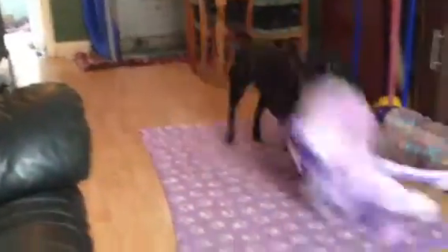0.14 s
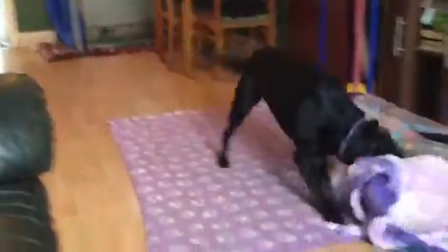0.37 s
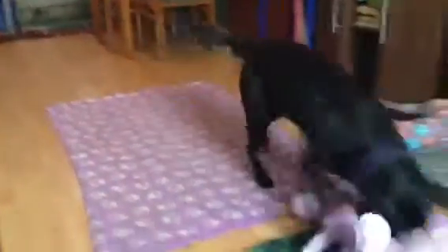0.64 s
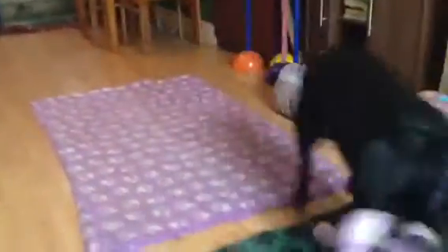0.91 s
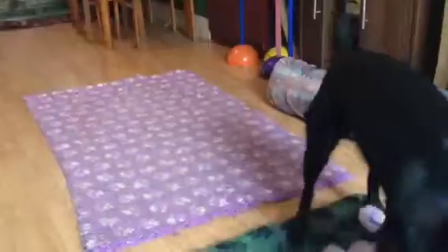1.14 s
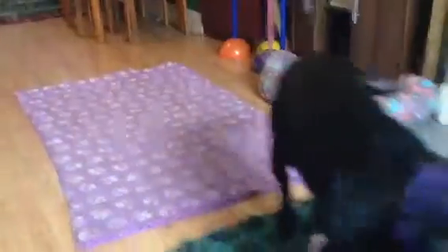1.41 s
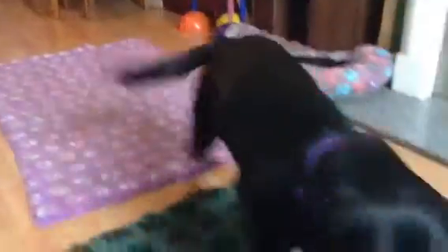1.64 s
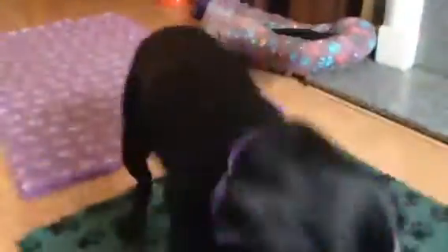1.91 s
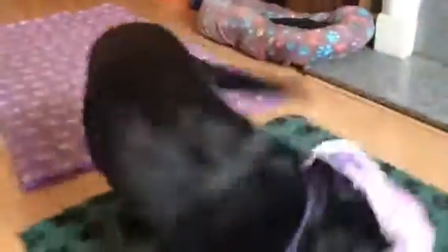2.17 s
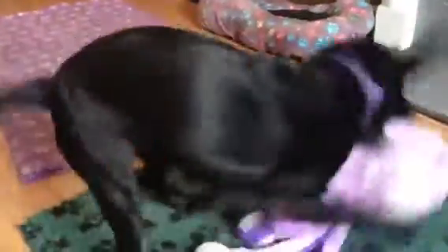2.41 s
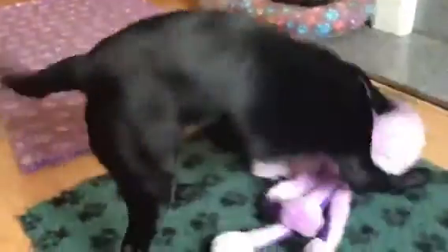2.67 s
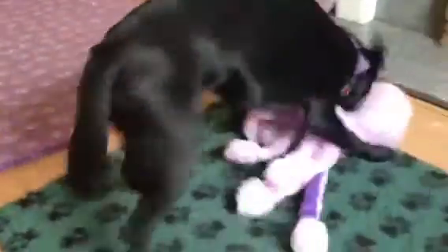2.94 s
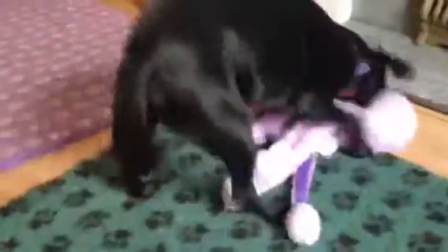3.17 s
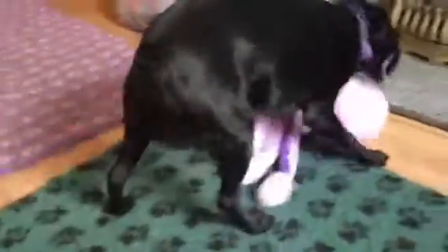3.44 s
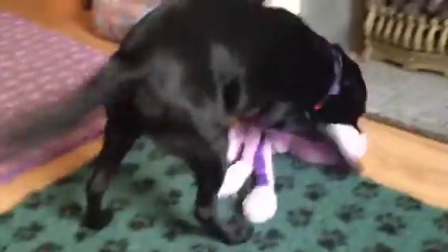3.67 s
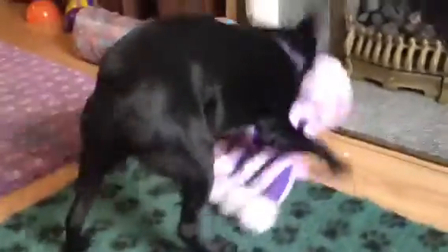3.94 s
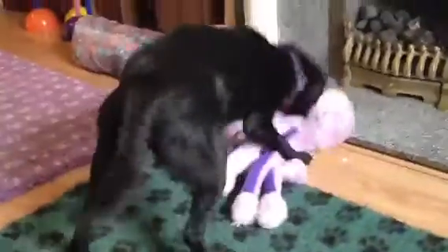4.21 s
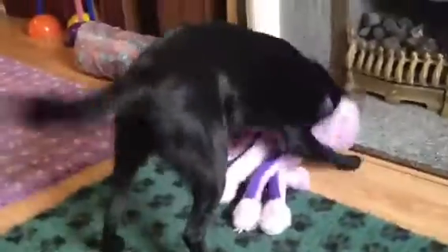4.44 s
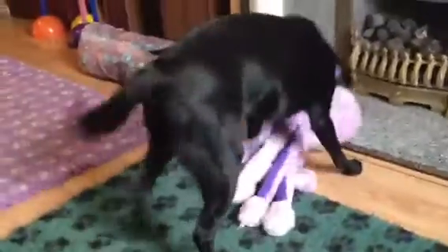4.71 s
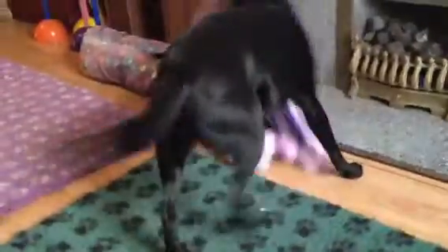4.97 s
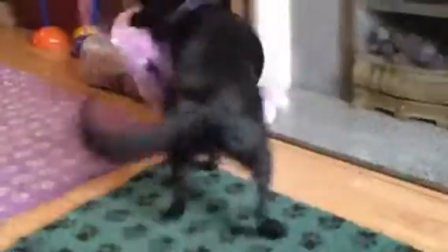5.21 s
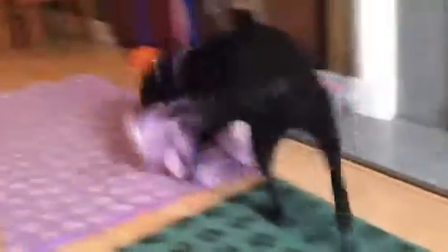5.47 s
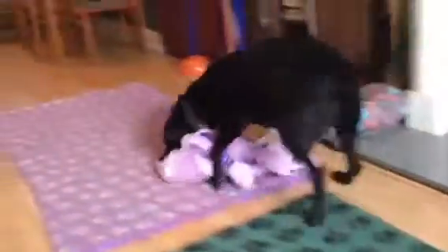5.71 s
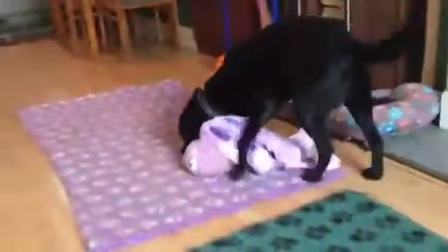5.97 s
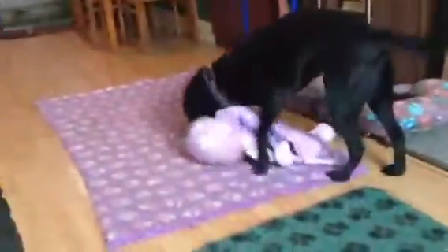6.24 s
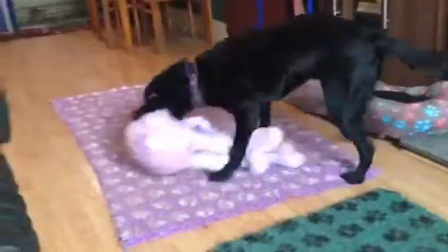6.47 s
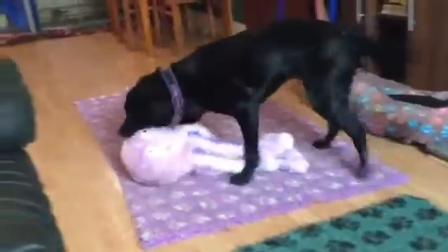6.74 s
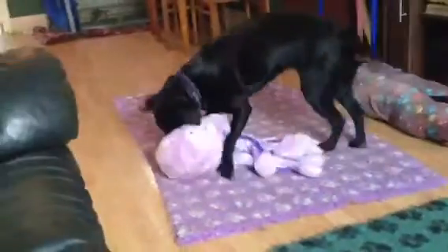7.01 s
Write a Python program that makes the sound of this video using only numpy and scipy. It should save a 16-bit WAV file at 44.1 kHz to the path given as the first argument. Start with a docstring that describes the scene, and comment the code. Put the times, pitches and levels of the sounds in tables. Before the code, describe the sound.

In a small furnished room, a dog shakes and drags a plush toy close to a phone. Brisk cloth rustling runs throughout, with dull paw thumps on wooden boards, brief claw squeaks and light ticking pops early on. Then bites bring short reedy grunts from the toy and loud dry plastic cracks, before a last tussle fades into softer rubbing.

```python
"""In a small furnished room, a dog shakes, drags and bites a plush toy over fleece mats on a wooden floor,
a couple of metres from a phone. Shaped noise makes the rustling cloth and the quiet hush of the house;
decaying tones make paws and toy thump on the boards, and unsteady tones make the claws squeak.
Plastic and seams pop as short bursts of noise with a ring. Bites drive a grunting reed, whose flaps
knock a resonant tube. The room answers toy, claws and cloth with a floor bounce and a brief tail."""
import sys
import numpy as np
from scipy import signal
from scipy.fft import rfft, irfft
from scipy.io import wavfile
from scipy.ndimage import uniform_filter1d

SR = 44100
rng = np.random.default_rng(int(sys.argv[2]) if len(sys.argv) > 2 else 0)


def digitize_waveform(pressure):
    """Quantize a signal to 16-bit integers and store it at the path in sys.argv[1].

    Rows of a 2-D input are taken as channels; values are limited to [-1, 1].
    """
    field = np.atleast_2d(pressure).T
    bounded = np.clip(field, -1, 1)
    quanta = np.round(bounded * 32767).astype(np.int16)
    wavfile.write(sys.argv[1], SR, quanta)


def rack_gain(trim_db):
    """Turn a fader trim in dB into the linear factor to multiply a signal by."""
    fader = np.asarray(trim_db, float)
    return 10 ** (fader / 20)


N = 313992  # length of the sound in samples


def level(x, db):
    """Scale to an rms level."""
    return x * rack_gain(db) / np.sqrt(np.mean(x ** 2))


def colour(x, table):
    """Shape the spectrum by (Hz, dB) points, joined evenly along log frequency."""
    hz, db = np.transpose(table)
    f = np.maximum(np.fft.rfftfreq(len(x), 1 / SR), 1)
    gain = rack_gain(np.interp(np.log(f), np.log(hz), db))
    return irfft(rfft(x) * gain, len(x))


def ring(modes, push_s=0., rise_s=1e-5):
    """Decaying sines (Hz, dB, t60 s), neighbours opposed in sign, after a push of given length; peak 1."""
    t = np.arange(int(SR * max(t60 for _, _, t60 in modes))) / SR
    y = np.zeros(len(t))
    for k, (hz, db, t60) in enumerate(modes):
        decay = np.exp(-np.log(1000) * t / t60)
        y += (-1) ** k * rack_gain(db) * np.sin(2 * np.pi * hz * t) * decay
    push = np.hanning(int(push_s * SR) + 3)
    y = np.convolve(y * (1 - np.exp(-t / rise_s)), push)
    return y / np.abs(y).max()


def add(out, s, x):
    """Mix x into out from time s."""
    i = int(s * SR)
    out[i:i + len(x)] += x[:len(out) - i]


def track(rows):
    """Start time and per-sample columns of a curve."""
    s, *columns = np.transpose(rows)
    t = np.arange(s[0], s[-1], 1 / SR)
    return s[0], [np.interp(t, s, c) for c in columns]


# Tone of the quiet house, before its overall level is set: (pitch_hz, relative_level_db)
HUSH_COLOUR = [(24, -55), (40, -62), (171, 3.5), (392, -7.5), (455, 0), (585, -10), (646, -44), (715, -28),
               (1150, -10.5), (14800, -52), (16000, -51)]


def hush():
    """The quiet house is steady noise, strongest in the low and middle pitches."""
    return level(colour(rng.standard_normal(N), HUSH_COLOUR), -65.5)


def swells(peak_s, db, rise_s, fall_s):
    """Gain of overlapping gestures, each climbing to its peak and falling away at a steady dB rate."""
    t = np.arange(0, N / SR + .004, .002)[:, None]
    tens_of_db_down = np.maximum((peak_s - t) / rise_s, (t - peak_s) / fall_s)
    power = rack_gain(2 * (db - 10 * tens_of_db_down))
    return np.interp(np.arange(N) / SR, t[:, 0], np.sqrt(power.sum(axis=1)))


def fibres(rate, spread_db, hiss):
    """Fibres letting go at random (rate per second), some louder than the rest, over a smooth hiss."""
    sizes = rack_gain(spread_db * np.minimum(rng.exponential(size=N), 4))
    slips = (rng.random(N) < rate / SR) * sizes * rng.standard_normal(N)
    return level(slips, 0) + hiss * rng.standard_normal(N)


# Strokes of cloth over cloth; the rise and fall times are per 10 dB, for the crisp part:
# (peak_s, crisp_level_db, rise_s, fall_s, dull_relative_to_crisp_db)
CLOTH_STROKES = [(0.0, -46, .05, .1, -3), (.196, -44, .008, .2, -12), (.3, -38.5, .1, .3, -3),
                 (.54, -44, .16, .12, -4), (.655, -37, .06, .08, 6), (.74, -39, .03, .08, 1),
                 (.84, -36.5, .08, .045, -6), (.94, -42, .1, .12, -11), (1.1, -42.5, .1, .11, -1),
                 (1.3, -47, .07, .07, 4), (1.38, -56, .05, .04, 5), (1.66, -47.5, .13, .18, -2),
                 (2.02, -52.5, .05, .06, -6), (2.168, -49, .005, .1, -8), (2.24, -43.5, .04, .2, -1),
                 (2.44, -45, .09, .08, 5), (2.6, -44, .13, .3, -3), (2.93, -46, .07, .2, -6),
                 (3.3, -42, .2, .15, -21), (3.56, -49, .2, .2, -21), (3.86, -48, .1, .2, -8),
                 (4.04, -41, .06, .15, -1), (4.36, -54, .1, .3, -9), (4.72, -45, .28, .13, -22),
                 (4.9, -45, .08, .18, -11), (5.08, -42.5, .04, .11, -8), (5.3, -47.5, .06, .07, -5),
                 (5.46, -44, .13, .09, -2), (5.54, -43, .05, .055, -7), (5.69, -39, .11, .2, -4),
                 (5.92, -51, .15, .3, -21), (6.1, -48, .1, .04, -12), (6.22, -46.5, .025, .2, -7),
                 (6.45, -45, .14, .08, -8), (6.6, -52.5, .08, .07, -11), (6.77, -59, .025, .16, -18),
                 (6.95, -47, .05, .14, -11), (7.12, -51, .03, .03, -18)]
# Weight shifting on the mats, passed on by the boards; fade per 10 dB either side:
# (peak_s, level_db, fade_s)
MAT_SCUFFS = [(0.0, -58, .08), (.26, -50, .07), (.64, -51, .09), (.84, -41, .04), (1.02, -46, .07),
              (1.38, -57, .2), (1.66, -59, .1), (1.82, -53, .045), (2.2, -54, .05), (2.34, -44, .08),
              (2.62, -46.5, .15), (2.86, -54, .12), (3.3, -50, .2), (3.56, -57, .3), (3.94, -53, .08),
              (4.43, -56, .3), (4.8, -58, .2), (5.1, -59, .07), (5.54, -46, .04), (5.69, -45, .14),
              (6.04, -45, .07), (6.22, -52.5, .08), (6.66, -54, .12), (6.95, -61, .3)]
# Tone of the crisp nap: (pitch_hz, relative_level_db)
NAP_COLOUR = [(880, -7), (1500, -2), (2410, -0.5), (2640, -0.5), (3770, 0.5), (6560, 2.5), (9850, -8.5),
              (12700, -9.5), (15200, -24), (16000, -56)]
# Tone of the dull backing: (pitch_hz, relative_level_db)
BACKING_COLOUR = [(400, -17), (800, 1.5), (1300, -10), (2200, -5), (3500, 11.5), (6000, 25)]
# Tone of the low shuffle through the boards: (pitch_hz, relative_level_db)
SHUFFLE_COLOUR = [(50, -17), (100, -24.5), (200, 10.5), (350, 16.5), (550, 5), (800, -1.5)]
# Pitches of the stray crackles: pitch_hz
CRACKLE_PITCHES = [3000, 4600, 5930, 7940]


def cloth():
    """Plush and fleece rub: crisp nap with stray crackles, dull backing, a low shuffle through the boards."""
    s, db, rise, fall, dull_db = np.transpose(CLOTH_STROKES)
    scuff_s, scuff_db, fade = np.transpose(MAT_SCUFFS)
    dull_quick = 1.4  # the dull rub swells and fades this many times faster
    crisp = level(colour(fibres(rate=4000, spread_db=2.2, hiss=1.5), NAP_COLOUR), 0)
    crackle = np.zeros(N)
    for hz in CRACKLE_PITCHES:
        clicks = fibres(rate=25, spread_db=2.5, hiss=0)
        crackle += np.convolve(clicks, ring([(hz, 0, .003)]))[:N]
    nap = crisp + level(crackle, -11)
    backing = level(colour(fibres(rate=1200, spread_db=2.5, hiss=1.5), BACKING_COLOUR), 0)
    shuffle = level(colour(fibres(rate=200, spread_db=4.0, hiss=0.98), SHUFFLE_COLOUR), 0)
    nap = nap * swells(s, db, rise, fall)
    backing = backing * swells(s, db + dull_db, rise / dull_quick, fall / dull_quick)
    return nap + backing + shuffle * swells(scuff_s, scuff_db, fade, fade)


# Paws and toy landing on the boards: (start_s, soft_peak_db, knuckle_relative_to_soft_db)
LANDINGS = [(0.027, -49, -13), (0.2, -34.5, -13), (0.654, -47, 0), (0.817, -49, 12), (0.986, -30, -0.5),
            (1.1, -50, -11), (1.814, -54.5, 3), (2.001, -43, 2), (2.301, -52.5, -1), (3.001, -41.5, -2),
            (3.293, -41.5, 17), (5.093, -47, -9), (5.526, -32, -4.5), (5.834, -35.5, -3),
            (5.963, -58.5, 19.5), (6.01, -55.5, 15), (6.681, -69, 24), (6.788, -53, -18)]
# Ringing tones of the boards: (pitch_hz, relative_level_db, time_to_fade_60_db_s)
BOARD_TONES = [(108.7, 11.5, 0.17), (135, 9, 0.23), (180, 2.5, 0.41)]
# Ringing tones of the higher knock: (pitch_hz, relative_level_db, time_to_fade_60_db_s)
KNUCKLE_TONES = [(260, -7.5, 0.1), (347.3, -13, 0.14), (455, -11.5, .09), (599, -11.5, 0.039)]


def thumps():
    """A soft pad pushes the boards slowly; bone under it adds a higher knock."""
    out = np.zeros(N)
    for s, db, knock_db in LANDINGS:
        add(out, s, rack_gain(db) * ring(BOARD_TONES, push_s=0.006, rise_s=.004))
        add(out, s, rack_gain(db + knock_db) * ring(KNUCKLE_TONES, push_s=0.0014, rise_s=0.0018))
    return out


# Claws skidding on varnish, one list of points per squeak:
# (time_s, mean_slip_rate_hz, mean_level_of_lowest_tone_db)
CLAW_SKIDS = [
    [(.441, 1108, -61), (.447, 1185, -38), (.456, 1190, -56)],
    [(.615, 1490, -34), (.621, 2000, -29), (.627, 3075, -34), (.632, 3423, -27), (.645, 3120, -28),
     (.651, 3080, -30.5), (.659, 2720, -46)],
    [(.82, 1350, -56), (.835, 1350, -48), (.87, 1300, -59), (.9, 1600, -53), (.94, 1850, -56),
     (.985, 2050, -54)],
]
# One row per squeak, lowest tone first, then its whole multiples: relative_level_db
CLAW_OVERTONES = [
    [0, -1, -2, -9, -8, -5],
    [0, -15, -12, -12],
    [0, -6],
]


def squeaks():
    """Claws stick and slip on the varnish: tones with overtones, unsteady in pitch and strength."""
    waver, flutter_db = .013, 2.5  # typical drift: share of the pitch, and dB
    out = np.zeros(N)
    for rows, overtones in zip(CLAW_SKIDS, CLAW_OVERTONES):
        s, (hz, db) = track(rows)
        smooth = uniform_filter1d(rng.standard_normal((2, SR // 4)), size=60)
        drift = level(smooth, 0)[:, :len(hz)]
        phase = 2 * np.pi * np.cumsum(hz * (1 + waver * drift[0])) / SR
        tone = np.zeros(len(hz))
        for multiple, overtone_db in enumerate(overtones, 1):
            tone += rack_gain(overtone_db) * np.sqrt(2) * np.cos(multiple * phase)
        strength = rack_gain(db + flutter_db * drift[1])
        add(out, s, strength * signal.windows.tukey(len(hz), .15) * tone)
    return out


# Plastic and seams popping under the teeth; a second snap is held to no louder than the first:
# (start_s, peak_db, ring_pitch_hz, second_snap_relative_db)
TOOTH_POPS = [(0.434, -29, 3720, -8), (0.6528, -27, 3070, -22), (0.8396, -29, 6360, -12),
              (1.0864, -26, 5740, -9), (1.123, -32, 4630, -14), (1.1644, -32, 4570, -4),
              (1.199, -26.5, 5960, -10.5), (1.266, -26.5, 6760, -15), (1.3609, -26.5, 6620, -5),
              (1.502, -35.5, 7000, -11), (2.1629, -35, 4600, -6), (2.1793, -30, 4200, -6),
              (2.4358, -27, 6450, -6), (2.4584, -25.5, 6300, -1), (2.5146, -27, 6100, -20),
              (2.5685, -30, 6300, -8), (3.2917, -2.5, 6120, -1.5), (3.4815, -15.5, 6150, 0),
              (3.5504, -33, 6320, -6), (4.0197, -30, 7000, -14), (4.0547, -12, 6000, 0),
              (4.4607, -30, 4660, 0), (4.4737, -8.5, 6100, -2), (4.7267, -18, 4330, -19),
              (4.743, -24.5, 5400, -4), (5.0647, -26.5, 6900, -14), (5.0886, -15, 6020, 0),
              (5.466, -29, 4060, -2), (5.6925, -9.5, 5670, -5), (5.7017, -29, 3700, 0),
              (6.3804, -32, 5030, -14), (6.4222, -25, 4310, -11), (6.4584, -35, 5400, -10),
              (6.4698, -21.5, 4450, -21), (6.5906, -36, 6600, 0), (6.6478, -25, 8520, -11),
              (6.749, -32, 5660, 0), (7, -32.5, 3000, -15)]
# Tone shared by every tear: (pitch_hz, relative_level_db)
SHELL_COLOUR = [(1200, -28), (2200, -12), (3200, -11), (4200, -1), (7500, -1.5), (9000, -10),
                (11000, -18.5), (14000, -15), (16000, -51)]


def pops():
    """Stiff plastic gives way, then once more: a dry tear of noise with a short ring of its own."""
    tear_t60, ring_db, again_s = 0.009, -5, .0021  # s; dB against the tear's peak; s between snaps
    out = np.zeros(N)
    t = np.arange(1024) / SR
    shape = (1 - np.exp(-t / 0.00054)) * np.exp(-np.log(1000) * t / tear_t60)
    for s, db, hz, again_db in TOOTH_POPS:
        for lag, gain_db in [(0, db), (again_s, db + min(again_db, 0))]:
            tear = shape * colour(rng.standard_normal(len(t)), SHELL_COLOUR)
            snap = tear / np.abs(tear).max()
            add(snap, 0, rack_gain(ring_db) * ring([(hz, 0, .006)], rise_s=.0003))
            add(out, s + lag, rack_gain(gain_db) * snap / np.abs(snap).max())
    return out


def bite(squeeze_s, release_s, top_hz, db):
    """Pressure builds evenly, then lets go; the reed's flap rate and strength follow."""
    slack_hz, sag = 128, 1.4  # flap rate at no pressure; bends the fall of the rate
    swell_db_per_hz, let_go_db = .021, 13  # swell per Hz gained; fade while letting go
    t = np.arange(0, squeeze_s + release_s, 1 / SR)
    up = np.minimum(t / squeeze_s, 1)
    down = np.clip((t - squeeze_s) / release_s, 0, 1)
    hz = slack_hz + (top_hz - slack_hz) * up * (1 - down) ** sag
    swell_db = swell_db_per_hz * (top_hz - slack_hz) * (1 - up)
    return hz, db - swell_db - let_go_db * down ** 2.5


# Bites on the grunter, whose reed flaps faster under more pressure; strength before the tube's ring:
# (start_s, squeeze_s, release_s, top_flap_rate_hz, top_flap_strength_db)
GRUNTER_BITES = [(2.644, .05, .043, 329, -9), (2.935, .036, .042, 320, -6.5),
                 (3.163, .047, .045, 312, -9.5), (3.633, .02, .04, 132, -18), (4.065, .08, .022, 307, -7.5),
                 (4.2, .004, .024, 198, -10), (4.489, .028, .09, 205, -14), (5.599, .046, .1, 162, -17.5)]
# How each bite tips the tube's tone at its high and low ends: (treble_gain_db, chest_gain_db)
BITE_TONE = [(-3, 15), (-1.5, 11), (-2.5, 13), (0.4, 14), (-4, 9.5), (-4.5, 15.5), (-2.1, 13), (-5, 10)]
# Ringing tones of the tube before each bite tips them:
# (pitch_hz, relative_level_db, time_to_fade_60_db_s)
TUBE_TONES = [(320, -13.5, 0.0093), (568, -9.5, 0.0067), (1057, -5.5, 0.015), (1300, 0.5, 0.016),
              (1600, 6, 0.01), (2182, 1, 0.005), (2750, -3.5, 0.0038), (3690, -1.5, 0.01),
              (4230, -1, 0.013), (5340, -28.5, 0.0059), (7200, -23, 0.018)]
# Tone of the air rasping past the reed: (pitch_hz, gain_db)
RASP_COLOUR = [(1500, -21), (3000, 8.5), (5000, 10.5), (8000, -2), (10000, -7.5), (13000, -1), (16000, -25)]


def grunter():
    """Each flap of the reed knocks the tube; air hisses through it and rasps past the reed just after."""
    jitter, scatter_db, air_db = .02, 1.1, -26  # share of a flap; dB; hiss into the tube, dB
    out, rasp = np.zeros((2, N))
    for (s, *jaws), (treble_db, chest_db) in zip(GRUNTER_BITES, BITE_TONE):
        hz, db = bite(*jaws)
        cycle = np.cumsum(hz) / SR
        flap = cycle.astype(int)
        edges = np.flatnonzero(np.diff(flap, prepend=-1))
        chance = rng.standard_normal((2, len(edges)))
        wobble = (jitter * chance[0] * SR / hz[edges]).astype(int) * (edges > 0)
        # air bursts at each flap and dies away; none comes before the second flap
        puff = np.exp(-(cycle - flap) / 0.29) * (flap > 0)
        air = rack_gain(db) * rng.standard_normal(len(hz)) * puff
        knock = rack_gain(air_db) * air
        hits = np.clip(edges + wobble, 0, len(hz) - 1)
        knock[hits] += rack_gain(db[edges] + scatter_db * chance[1])
        knock[0] *= rack_gain(-7)  # the reed's first swing barely closes
        modes = []
        for f, g, t60 in TUBE_TONES:
            tip_db = np.interp(f, [700, 1200, 2400, 3500], [chest_db, 0, 0, treble_db])
            modes.append((f, g + tip_db, t60))
        add(out, s, signal.fftconvolve(knock, ring(modes, rise_s=.0004)))
        add(rasp, s, rack_gain(treble_db - 13) * air)
    # so small a tube cannot radiate bass
    no_bass = signal.butter(3, 190, "high", fs=SR, output="sos")
    return signal.sosfilt(no_bass, out) + colour(rasp, RASP_COLOUR)


# How long the room rings at each pitch: (pitch_hz, time_to_fade_60_db_s)
ROOM_FADE = [(100, 0.51), (500, 0.33), (1500, 0.36), (4000, 0.26), (8000, 0.17), (15000, 0.11)]


def room(dry, floor_db, tail_db, floor_s=.0034, gap_s=.006):
    """Direct sound, its bounce off the mats, and a diffuse tail that dulls as it dies."""
    size = SR * 3 // 5
    f, t, z = signal.stft(rng.standard_normal(size), SR, nperseg=256)
    hz, t60 = np.transpose(ROOM_FADE)
    fall = np.interp(np.log(f + 1), np.log(hz), t60)[:, None]
    tail = signal.istft(z * np.exp(-np.log(1000) * t / fall), SR)[1][:size]
    tail *= 1 - np.exp(-(np.arange(size) / SR / gap_s) ** 2)  # the tail builds up gradually
    answer = rack_gain(tail_db) * tail / np.sqrt(np.sum(tail ** 2))
    answer[0] += 1
    answer[int(floor_s * SR)] += rack_gain(floor_db)
    return signal.fftconvolve(dry, answer)[:N]


def scene():
    """Toy, claws and cloth go through the room; thumps and the house's hush are added as they are."""
    grunts = grunter()
    toy = room(grunts, floor_db=-11, tail_db=-6)
    # from 5.3 s on the dog's body hides this share of the grunts' direct sound
    shadow = .55 * (np.arange(N) / SR > 5.3)
    toy = toy - shadow * grunts
    small = room(pops() + squeaks(), floor_db=-9, tail_db=-7.5, gap_s=.009)
    fabric = room(cloth(), floor_db=-30.5, tail_db=-16)
    return (toy + small + fabric + thumps() + hush())[None]


def low_pass(x):
    """Removes everything above the highest recorded frequency."""
    return signal.sosfilt(signal.butter(12, 16620, fs=SR, output="sos"), x)


def record(dry):
    """The phone's microphone chain drops the deep bass and the top."""
    no_deep_bass = signal.butter(3, 90, "high", fs=SR, output="sos")
    no_top = signal.ellip(8, .2, 60, 15550, fs=SR, output="sos")
    heard = signal.sosfilt(no_top, signal.sosfilt(no_deep_bass, dry))
    return low_pass(heard)


dry = scene()
out = record(dry)
digitize_waveform(out)
```